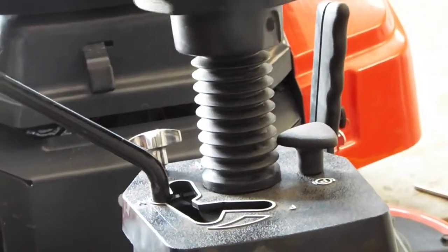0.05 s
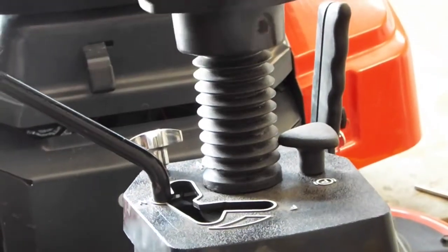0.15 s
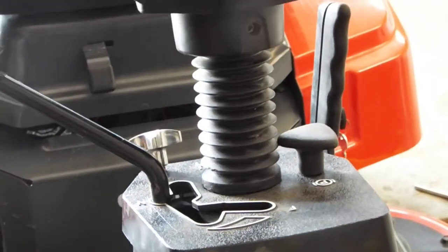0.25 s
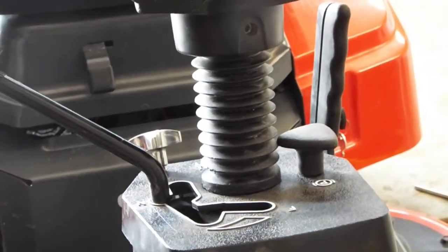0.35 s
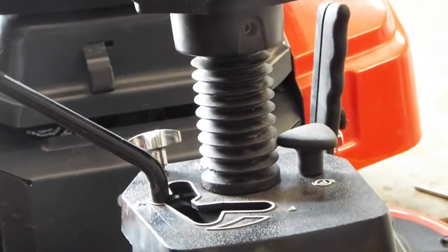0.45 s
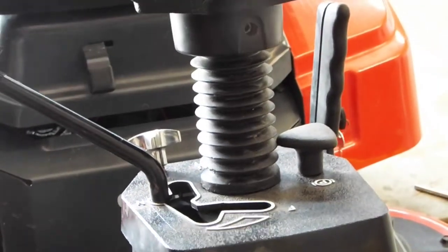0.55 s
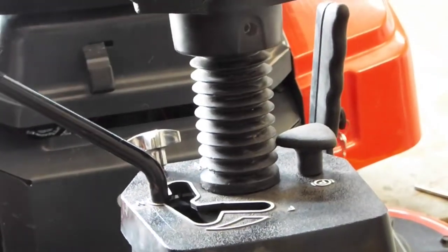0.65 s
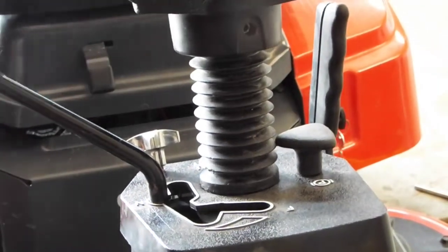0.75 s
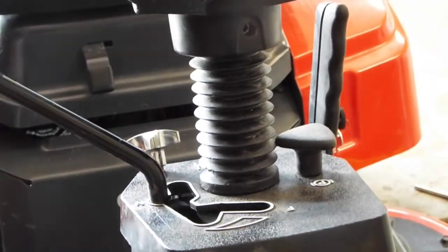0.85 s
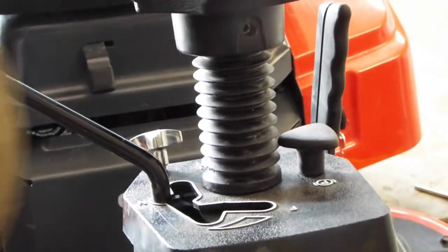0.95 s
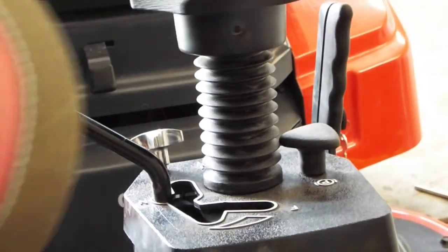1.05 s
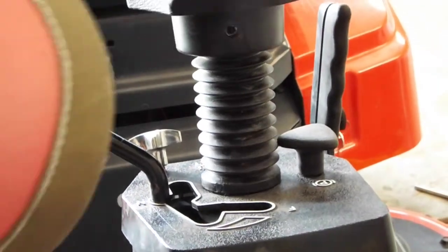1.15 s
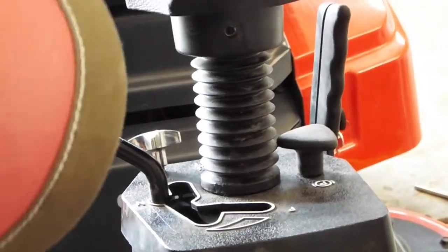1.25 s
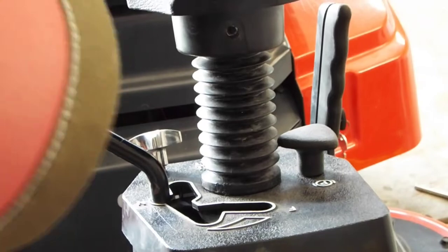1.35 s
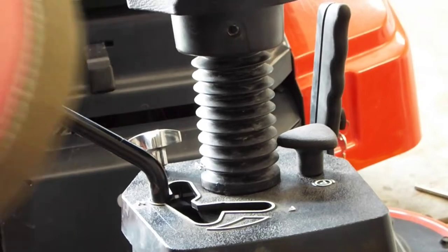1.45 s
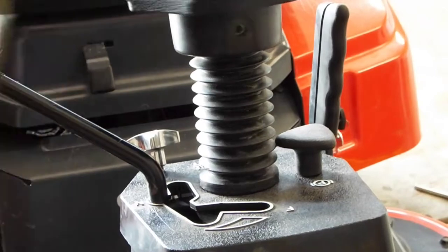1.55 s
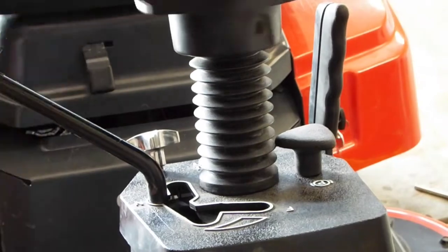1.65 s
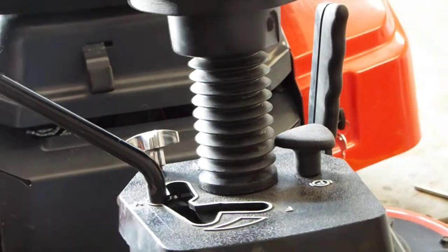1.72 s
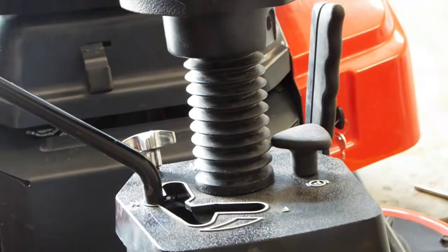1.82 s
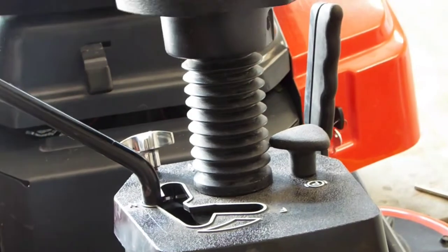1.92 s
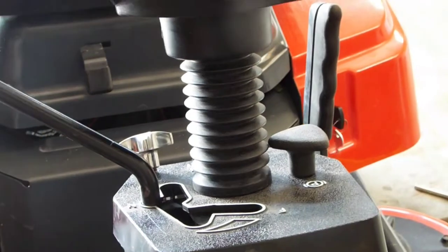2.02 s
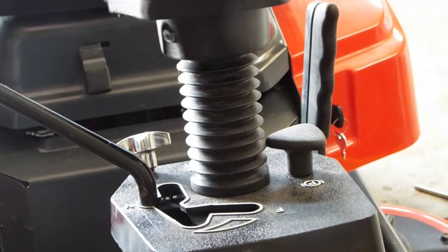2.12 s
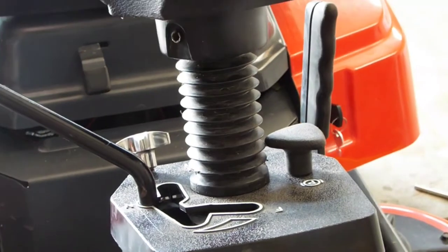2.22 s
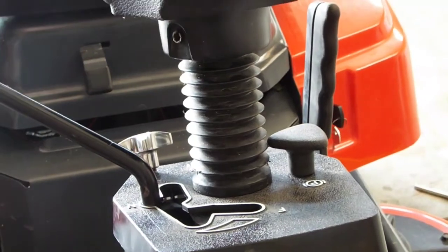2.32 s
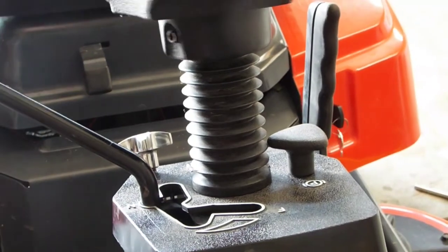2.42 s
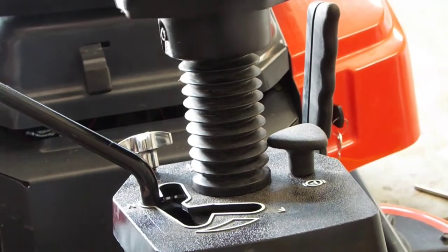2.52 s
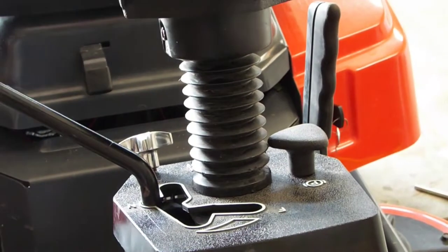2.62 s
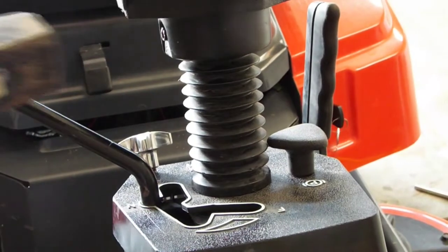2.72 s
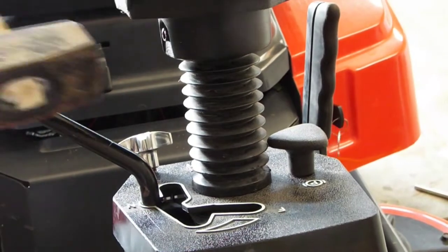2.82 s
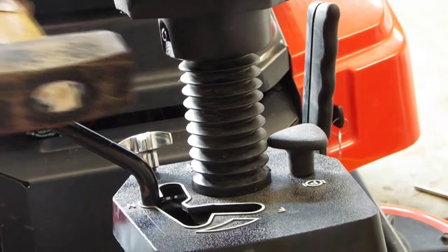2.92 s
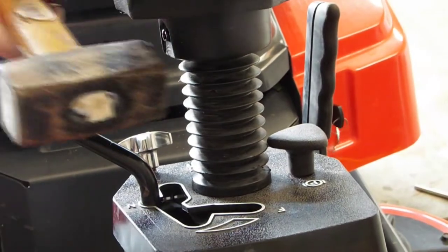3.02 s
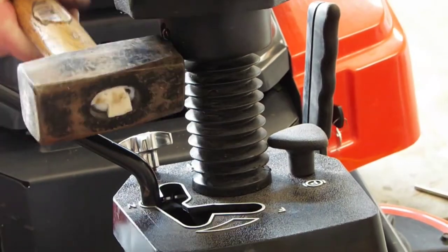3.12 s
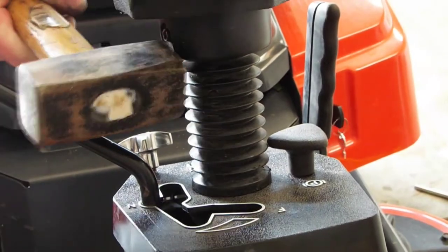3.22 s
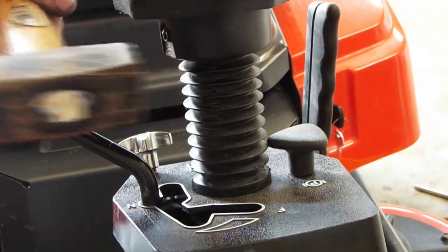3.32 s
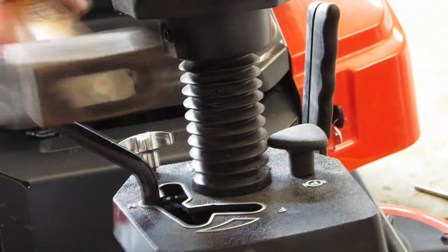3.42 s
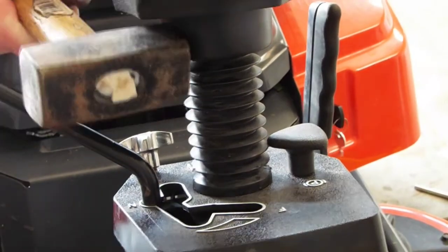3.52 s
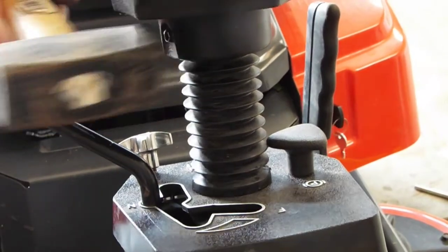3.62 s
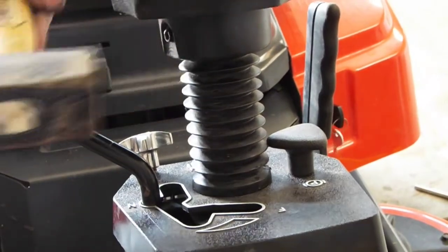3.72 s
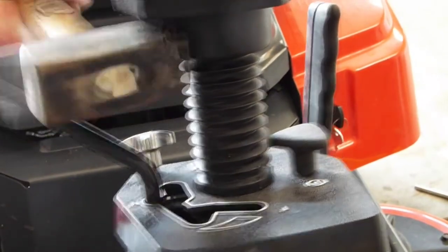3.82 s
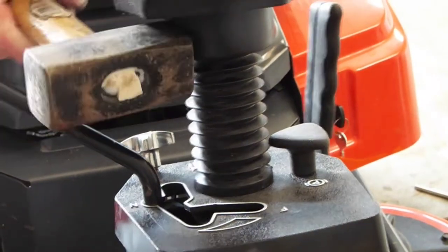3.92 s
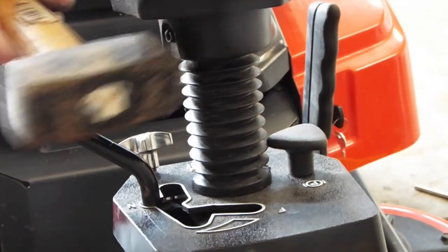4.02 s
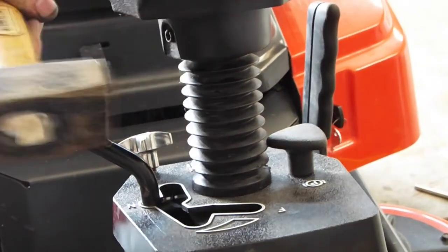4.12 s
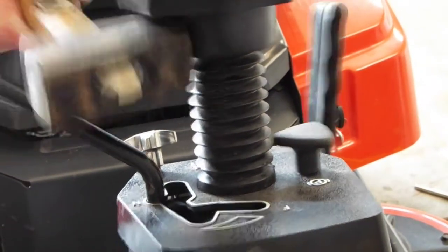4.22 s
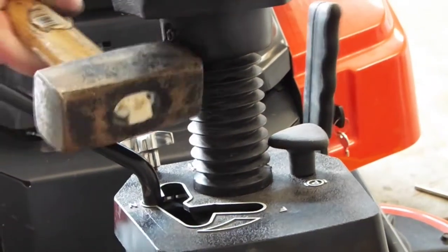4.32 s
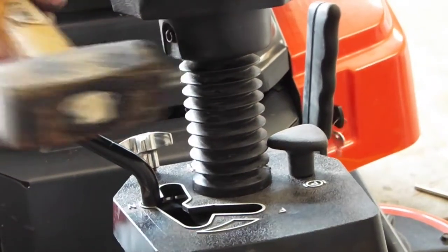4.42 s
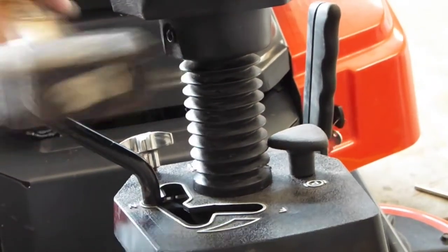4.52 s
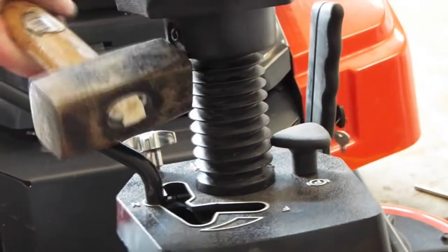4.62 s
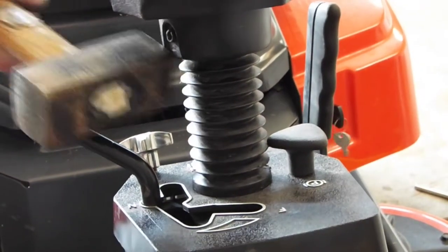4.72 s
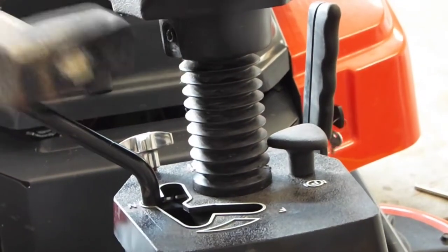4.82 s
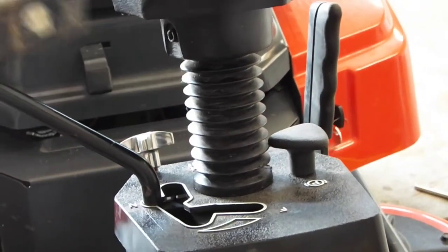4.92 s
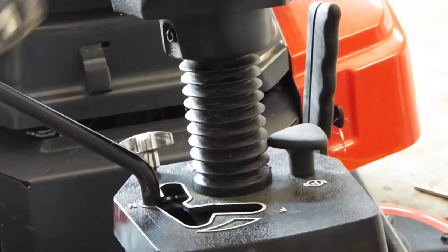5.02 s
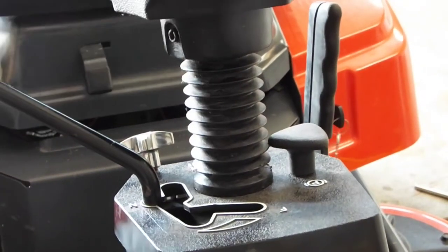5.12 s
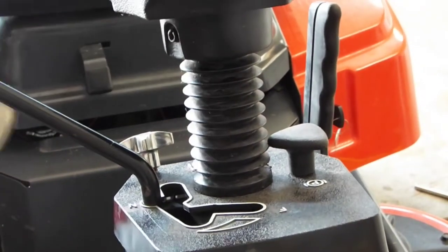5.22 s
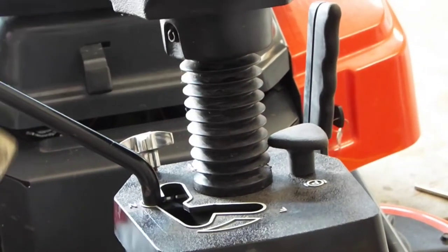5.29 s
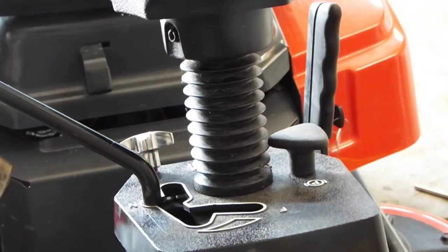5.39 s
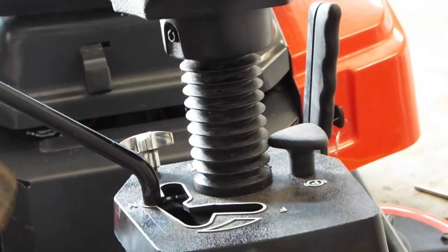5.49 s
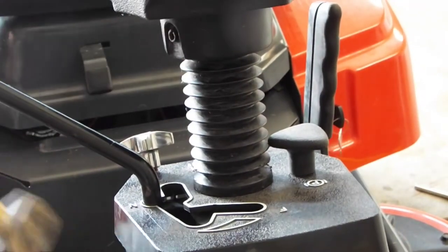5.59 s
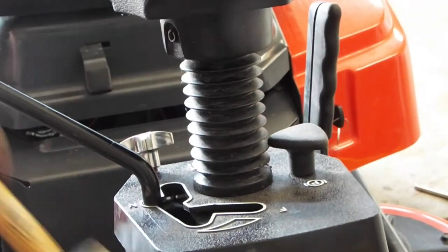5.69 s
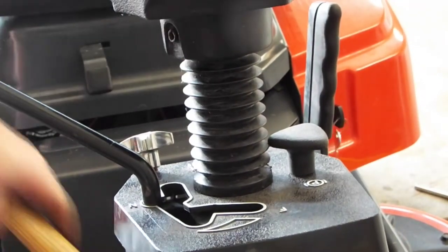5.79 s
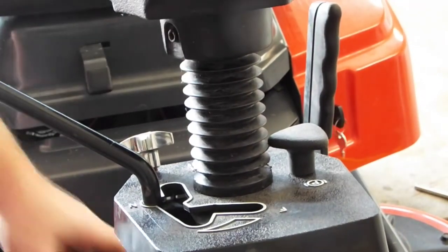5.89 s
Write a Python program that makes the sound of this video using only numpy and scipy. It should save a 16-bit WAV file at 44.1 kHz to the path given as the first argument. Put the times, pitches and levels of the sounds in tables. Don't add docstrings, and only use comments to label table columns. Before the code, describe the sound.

A concrete garage with steady soft hiss and distant low rumble. From 0 to 1 s shoes and cloth scuff lightly, with a faint bird whistle at 0.6. Between 1.1 and 2.4 s tools are handled and set down: dull thuds, a bright tap near 1.4, stronger knocks at 1.5 and 1.7, a gritty scuff at 2.1 and a clack at 2.35. A light clink comes at 2.8. Then a club hammer drives a steel pin close by: a moderate double-contact blow at 3.06, the hardest at 3.4, brighter, looser clangs at 3.79, 4.17 and 4.51, and a soft nasal rebound at 4.75. Each is a short, dry, overloaded crack with damped steel ring and housing thump; the level ducks, then dense room decay swells back for about half a second. From 5 s come tiny ticks, light scuffs, a clink at 5.7 and thin falling bird whistles at 5.1-5.5 and 5.9.

```python
import sys
import numpy as np
from scipy import signal
from scipy.fft import rfft, irfft, next_fast_len
from scipy.io import wavfile
from scipy.ndimage import map_coordinates

SR = 44100
rng = np.random.default_rng(int(sys.argv[2]) if len(sys.argv) > 2 else 0)


def transcribe(signal):
    frames = np.atleast_2d(signal).T
    limited = np.clip(frames, -1, 1)
    pcm = np.round(limited * 32767).astype(np.int16)
    wavfile.write(sys.argv[1], SR, pcm)


def boost_factor(decibels):
    exponent = np.asarray(decibels, float) / 20
    return 10 ** exponent


N = 262395
RING = 9000

# start in seconds, strength in dB, room share in dB,
# contact cut-off in Hz (higher is harder), housing thump in dB.
BLOWS = [
    (3.0619, -6.5, -2.5, 3860, -20.5),
    (3.0649, -5.5, -44, 5000, -45),
    (3.4016, 11.5, -5.5, 7000, -26.5),
    (3.7902, 7.5, 0.5, 14600, -22.5),
    (4.1718, -3, -7.5, 2500, -17.5),
    (4.1733, 7, 1.5, 8100, -18),
    (4.509, 8, 0.5, 8400, -29.5),
    (4.7514, -15, 3, 4400, -18.5),
]
# frequency in Hz, left-right likeness from 0 to 1.
FLOOR_ALIKE = [(60, 0.96), (180, 0.88), (550, 0.88), (1650, 0.91), (4970, 0.4), (15000, 0.25)]


def at_hz(points, hz):
    return np.interp(np.log(hz), np.log(np.array(points)[:, 0]), np.array(points)[:, 1])


def peaks_db(peaks, hz):
    return sum(db * np.exp(-(2 * (hz - top_hz) / width_hz) ** 2) for top_hz, width_hz, db in peaks)


def rms_one(x):
    return x / np.sqrt(np.mean(x ** 2) + 1e-20)


def drift(rate_hz):
    places = np.arange(N) / SR * rate_hz * 2
    return map_coordinates(rng.standard_normal(2000), [places], order=3)


def dull(x, hz):
    return signal.lfilter(*signal.butter(1, min(hz, 0.45 * SR), fs=SR), x)


def strike(modes, spread_db):
    t, chance = np.arange(RING) / SR, rng.standard_normal(len(modes))
    out = 0
    for k, (hz, db, t60_s) in enumerate(modes):
        decay = boost_factor(db + spread_db * chance[k] - 60 * t / t60_s)
        out = out + (-1) ** k * decay * np.sin(2 * np.pi * hz * t)
    return out


def add(track, sound, s):
    at = round(s * SR)
    track[at:at + len(sound)] += sound[:N - at]


def stereo(mid, side, likeness):
    c = np.clip(likeness, 0, 1)
    return np.sqrt(1 + c) * mid + np.sqrt(1 - c) * side * [[1], [-1]]


def steady(spectrum, alike):
    size = next_fast_len(N)
    hz = np.fft.rfftfreq(size, 1 / SR) + 1
    mid, side = rfft(rng.standard_normal((2, size))) * boost_factor(at_hz(spectrum, hz))
    return rms_one(irfft(stereo(mid, side, at_hz(alike, hz)), size)[:, :N])


def noise_floor():
    # frequency in Hz, density in dB per Hz.
    floor_colour = [(12, -30.5), (20, 1), (90, -5.5), (482, -18), (539, -17), (843, -16.5), (1320, -23.5),
                    (4140, -32), (4630, -33), (15800, -39)]
    return boost_factor(-48.5) * steady(floor_colour, FLOOR_ALIKE)


def far_rumble():
    # frequency in Hz, density in dB per Hz.
    rumble_colour = [(15, -5), (30, -16.5), (100, 5.5), (140, -2.5), (250, -35.5), (1000, -86)]
    return boost_factor(-53 + 2.0 * drift(18)) * steady(rumble_colour, FLOOR_ALIKE)


def bands(size, alike, gain):
    out, edges = 0, 20 * 2 ** (np.arange(30) / 3)
    run_in = 4000
    white = rng.standard_normal((2, 2, size + run_in))
    for k, (low, high) in enumerate(zip(edges, edges[1:])):
        hz = np.sqrt(low * high)
        band = signal.butter(2, [low, high], "band", fs=SR, output="sos")
        mid, side = signal.sosfilt(band, white[k % 2])[:, run_in:]
        out = out + gain(hz) * stereo(mid, side, at_hz(alike, hz))
    return out


def garage(x):
    # frequency in Hz, left-right likeness from 0 to 1.
    room_alike = [(60, .995), (180, .9998), (550, .9997), (1100, .998), (2200, .982), (4400, .925),
                  (8000, .78), (15000, .5)]
    # frequency in Hz, reverberation time in seconds.
    room_t60 = [(100, 0.49), (260, 0.65), (600, 0.61), (1800, 0.67), (3000, 0.63), (4800, 0.67),
                (9000, 0.47), (14000, 0.38)]
    # frequency in Hz, level of the reflections in dB.
    room_colour = [(60, -6.5), (200, -4.5), (330, -3), (480, -0.5), (620, -4.5), (1000, -0.7), (5000, -4.5),
                   (15000, -2)]
    # frequency in Hz, level in dB, t60 in seconds.
    room_modes = [(142, -63.5, .6), (223.8, -63, 0.66), (244, -59, .7), (294.1, -61, .5),
                  (400, -62.5, 0.71)]
    t = np.arange(SR) / SR

    def envelope(hz):
        build_up = 1 - np.exp(-t / (0.001 + 0.88 / hz))
        return boost_factor(at_hz(room_colour, hz) - 60 * t / at_hz(room_t60, hz)) * build_up

    echo = bands(SR, room_alike, envelope)
    echo = echo / np.sqrt(np.sum(echo ** 2) / 2)
    waves = sum(boost_factor(db - 60 * t / t60_s) * np.sin(2 * np.pi * hz * t) for hz, db, t60_s in room_modes)
    echo = echo + waves * (1 - np.exp(-t / 0.02))
    size = next_fast_len(N + SR)
    return irfft(rfft(x, size) * rfft(echo, size), size)[:, :N]


def bird():
    # start in seconds, length in seconds, pitch in Hz, level in dB.
    whistles = [
        (0.605, .1, 3100, -66),
        (2.86, 0.11, 3150, -70),
        (5.135, 0.16, 4360, -59.5),
        (5.18, .06, 4750, -62),
        (5.203, .07, 4020, -64),
        (5.378, 0.092, 3750, -66),
        (5.311, .16, 4190, -62),
        (5.491, 0.018, 2650, -57),
        (5.86, .1, 3120, -60),
        (5.89, .07, 3010, -59),
    ]
    sag_hz_per_s, fade_db_per_s, edge_s = 340, 39.5, 0.02
    t, out = np.arange(N) / SR, 0
    flicker, waver = boost_factor(3.3 * drift(30)), 1 + 0.013 * drift(90)
    for s, length_s, hz, db in whistles:
        gate = np.clip(np.minimum(t - s, s + length_s - t) / edge_s + 1, 0, 1) ** 2
        since = np.clip(t - s, 0, length_s)
        cycles = np.cumsum((hz - sag_hz_per_s * since) * waver) / SR
        out = out + gate * boost_factor(db - fade_db_per_s * since) * np.sin(2 * np.pi * cycles)
    return flicker * out


def scuffs():
    # time of the top in seconds, swell in seconds, hiss in dB, drag in dB.
    steps = [(.09, 1.5, -49, -48), (.19, 0.38, -55, -54.5), (0.302, 0.37, -55.5, -60),
             (.5, 0.62, -64.5, -58.5), (0.818, 0.08, -57, -57), (1.022, 0.19, -43.5, -46.5),
             (1.15, .15, -55, -73), (1.78, .06, -51, -49.5), (1.98, 0.17, -44, -54),
             (2.089, 0.19, -37.5, -36), (2.29, 0.18, -76, -62), (2.56, .2, -65, -61),
             (2.76, 0.21, -59.5, -66), (2.81, .03, -55.5, -60.5), (2.88, .1, -56, -63.5),
             (5.4, 0.18, -70, -65), (5.51, .12, -53.5, -71.5), (5.63, 0.089, -60, -66),
             (5.72, 0.031, -53, -61.5), (5.83, .1, -59, -62)]
    # frequency in Hz, density in dB per Hz.
    hiss_colour = [(880, -27), (1500, -4), (1680, -9), (2400, -8), (5300, -5), (7720, -12), (10400, -17),
                   (15000, -34)]
    # frequency in Hz, density in dB per Hz.
    drag_colour = [(60, -32), (120, -7), (230, 2), (600, -4), (1200, -3.5), (2200, -15), (5000, -61)]
    # frequency in Hz, left-right likeness from 0 to 1.
    scuff_alike = [(60, 0.94), (240, 0.98), (950, 1), (3770, 0.96), (15000, 0.47)]
    rise_db, fall_db_per_s = 20, 80
    t, hiss, drag = np.arange(N) / SR, 0, 0
    for s, swell_s, hiss_db, drag_db in steps:
        shape_db = np.minimum(rise_db * (t - s) / swell_s, fall_db_per_s * (s - t))
        hiss = np.hypot(hiss, boost_factor(hiss_db + shape_db))
        drag = np.hypot(drag, boost_factor(drag_db + shape_db))
    hiss = hiss * boost_factor(0.79 * drift(18)) * steady(hiss_colour, scuff_alike)
    return hiss + drag * boost_factor(2.1 * drift(25)) * steady(drag_colour, scuff_alike)


def knocks():
    # start in seconds, thud in dB, ring in dB, broad knock in dB, its cut-off in Hz.
    touches = [
        [(1.143, -50.5, -73, -36, 250), (1.368, -34.5, -65, -23, 900), (1.385, -35.5, -64, -23, 1300),
         (2.04, -46, -75, -28, 400), (1.5021, -35, -33.5, -8, 5000), (1.6837, -32, -58.5, -10, 450)],
        [(1.725, -62, -52, -12.5, 4060), (2.3447, -43.5, -37.5, -18, 7000)],
        [(1.3952, -59, -55.5, -14, 7800)],
        [(.8206, -69, -59.5, -28, 9000), (1.4477, -69, -45, -45, 8950), (1.6478, -74, -46, -35, 8910),
         (5.0066, -78, -52, -28, 8970), (5.28, -70.5, -61, -48, 9000), (5.405, -77, -59, -41, 9000),
         (5.5, -84, -50.5, -44, 9000), (5.565, -71, -63, -45, 8960)],
        [(2.7922, -79, -39.5, -34.5, 6020), (5.6993, -74, -47, -40, 6030), (4.855, -37, -80, -36, 300)],
    ]
    # frequency in Hz, level in dB, t60 in seconds.
    ringing = [
        [(1300, -3.5, 0.042), (1700, 0, 0.023), (3400, -7, 0.014), (5440, -10, 0.035), (5830, -5.5, 0.013),
         (7000, -13, 0.02)],
        [(1102, -3, 0.039), (1390, -10, 0.018), (5280, 1.5, 0.006), (6000, 1, 0.006), (6840, -3, .012),
         (8600, -16, .04), (11140, -24, .02)],
        [(3860, 6, 0.011), (4930, 13.5, 0.015), (6450, -3.5, 0.0059), (8400, -2, 0.01), (8600, -18, 0.0079),
         (10330, -18, 0.037)],
        [(6040, 4, 0.003), (9870, 1, 0.002), (11630, -3, 0.002)],
        [(3150, -2.5, 0.0083), (3800, -3, .006), (4700, -5, 0.0061), (6020, -6.5, 0.01), (6600, -13.5, 0.0064)],
    ]
    # frequency in Hz, level in dB, t60 in seconds.
    thud_modes = [(163, 1, 0.025), (231, 1, 0.046), (310, 0.5, 0.034), (414, -2, 0.032), (534, -3, 0.039),
                  (709, 0.5, 0.017), (1140, -3, .012)]
    near, sent = np.zeros(N), np.zeros(N)
    click = 1.0 * (np.arange(RING) == 0)
    for group, modes in zip(touches, ringing):
        for s, thud_db, ring_db, knock_db, cut_hz in group:
            thud = boost_factor(thud_db) * dull(strike(thud_modes, spread_db=3.0), cut_hz)
            body = thud + boost_factor(ring_db) * strike(modes, spread_db=0.94)
            knock = boost_factor(knock_db) * dull(dull(dull(click, cut_hz), cut_hz), 8200)
            add(near, boost_factor(7.5) * body + boost_factor(-4) * knock, s)
            add(sent, boost_factor(11.5) * body + boost_factor(11.5) * knock, s)
    return near, sent


def freed(s):
    from_s, by_s = 3.1, 3.8
    return np.clip((s - from_s) / (by_s - from_s), 0, 1)


def landing(s):
    # frequency in Hz, width in Hz, lift in dB.
    tight = [(930, 510, 5.5), (1800, 340, 6), (2030, 200, 6), (2455, 250, -0.6), (2890, 620, 7.5),
             (3560, 680, 0.5), (4270, 300, 1.5), (4900, 190, -2.5), (5400, 310, 2), (8350, 1300, -5.5),
             (9250, 500, -2.7)]
    # frequency in Hz, width in Hz, lift in dB.
    sliding = [(250, 200, -0.5), (1250, 190, 3), (1650, 260, 2), (2540, 340, -2), (4330, 180, 1.5),
               (7800, 1400, -1.5), (10100, 3400, 3)]
    # time in seconds, frequency in Hz, width in Hz, lift in dB.
    accents = [
        (3.4, 2030, 241, 4),
        (3.4, 2806, 400, 2),
        (3.79, 10100, 1503, 2),
        (3.79, 14980, 2000, -5.5),
        (4.17, 492, 202, -1.5),
        (4.51, 250, 230, -4),
        (4.51, 1250, 301.5, -4),
        (4.51, 10100, 1800, -3),
        (4.75, 2680, 500, 7.5),
    ]
    free = freed(s)
    held = [(hz, width_hz, db * (1 - free)) for hz, width_hz, db in tight]
    loose = [(hz, width_hz, db * free) for hz, width_hz, db in sliding]
    return held + loose + [peak for at, *peak in accents if abs(at - s) < 0.05]


def clang(peaks):
    # frequency in Hz, density in dB per Hz.
    clang_colour = [(35, -64.5), (60, -31), (133, -4), (175, -8.5), (232, -5.5), (345, -9), (525, -8.5),
                    (711, -9.5), (1690, -7), (4930, -9.5), (9690, -20.5), (15800, -39.5)]
    hz = np.fft.rfftfreq(2 * RING, 1 / SR) + 1
    colour_db = at_hz(clang_colour, hz) + peaks_db(peaks, hz)
    cepstrum = irfft(np.log(boost_factor(colour_db)))
    cepstrum[1:RING] *= 2
    cepstrum[RING + 1:] = 0
    pulse = irfft(np.exp(rfft(cepstrum)))[:RING]
    return pulse / np.sqrt(np.sum(pulse ** 2))


def hammer():
    # frequency in Hz, level in dB, t60 in seconds.
    steel_modes = [(1005, -15, 0.016), (1168, -4, 0.0025), (1705, -4, .02), (2130, -3.5, 0.025),
                   (2720, -15.5, 0.023), (3100, -1, 0.02), (4540, -13, 0.0035), (5000, -14, 0.0033),
                   (5900, -24.5, 0.013), (7270, -21.5, 0.018), (9300, -4.5, 0.0094), (9590, -15, 0.002)]
    # frequency in Hz, width in Hz, lift in dB.
    freed_steel = [(750, 650, 10), (1643, 360, 4), (3100, 970, 0.5)]
    # frequency in Hz, level in dB, t60 in seconds.
    housing_modes = [(130.3, -4, 0.11), (206.4, -3.5, 0.11), (238, 0.5, 0.17), (283, 1.5, 0.045),
                     (343, -13.5, 0.022), (491, -5.5, 0.089), (920, -4.5, 0.033)]
    # start in seconds, frequency in Hz, level in dB, t60 in seconds.
    pin_tones = [(3.0652, 9300, -24.5, 0.032), (3.0648, 5970, -22, .012), (3.4025, 10850, -25.5, 0.091),
                 (3.7894, 13000, -22, .08), (3.7903, 10750, -19, .06), (3.7903, 13900, -27.5, .05),
                 (4.7522, 10550, -56, 0.073), (3.0652, 758, -22, 0.025), (3.792, 1660, -2, 0.043),
                 (4.1755, 1565, 3.5, .03), (4.51, 1620, -1.5, 0.046)]
    crack_db, crack_t60_s, clang_db = 0.5, 0.026, 25
    near, sent, t = np.zeros(N), np.zeros(N), np.arange(RING) / SR
    jolt = boost_factor(-22.5 - 60 * t / 0.06) * np.sin(2 * np.pi * 45 * t)
    for s, strength_db, room_db, hard_hz, thump_db in BLOWS:
        pulse = clang(landing(s))
        rattle = boost_factor(crack_db - 60 * t / crack_t60_s) * rng.standard_normal(RING)
        crack = signal.fftconvolve(rattle, pulse)[:RING]
        crack = crack - dull(crack, 900)
        shifted = [(hz, db + freed(s) * peaks_db(freed_steel, hz), t60_s) for hz, db, t60_s in steel_modes]
        steel = -strike(shifted, spread_db=3.0)
        thump = boost_factor(thump_db) * strike(housing_modes, spread_db=3.5)
        direct = dull(crack + steel, hard_hz) + thump - freed(s) * jolt
        to_room = dull(boost_factor(clang_db) * pulse, hard_hz) + boost_factor(3.5) * thump
        add(near, boost_factor(strength_db) * direct, s)
        add(sent, boost_factor(strength_db + room_db) * to_room, s)
    for s, *mode in pin_tones:
        add(near, strike([mode], spread_db=-6.5), s)
        add(sent, boost_factor(-8) * strike([mode], spread_db=-1.5), s)
    return near, sent


def scene():
    background = noise_floor() + far_rumble()
    calls = bird()
    small, small_sent = knocks()
    blows, blows_sent = hammer()
    direct = blows + small + boost_factor(0.5) * calls
    reverberant = garage(blows_sent + small_sent + boost_factor(-11) * calls)
    return direct + reverberant + scuffs() + background


def band_limit(x):
    return signal.sosfilt(signal.butter(12, 15970, fs=SR, output="sos"), x)


def record(dry):
    delay_s, fall_s, rise_s = 0.00063, 0.001, 0.1
    threshold_db, duck_per_db = -1, 1.49
    t, duck = np.arange(N) / SR, np.zeros(N)
    for s, strength_db, *_ in BLOWS:
        start, duck_db = s + delay_s, duck_per_db * (strength_db - threshold_db)
        dip = np.interp(t, [start, start + fall_s, start + rise_s], [0, duck_db, 0])
        duck = np.maximum(duck, dip)
    ducked = dry * boost_factor(-duck)
    squared = ducked / (1 + np.abs(ducked) ** 8) ** (1 / 8)
    rolled = signal.sosfilt(signal.butter(2, 15000, fs=SR, output="sos"), squared)
    return band_limit(rolled)


dry = scene()
out = record(dry)
transcribe(out)
```